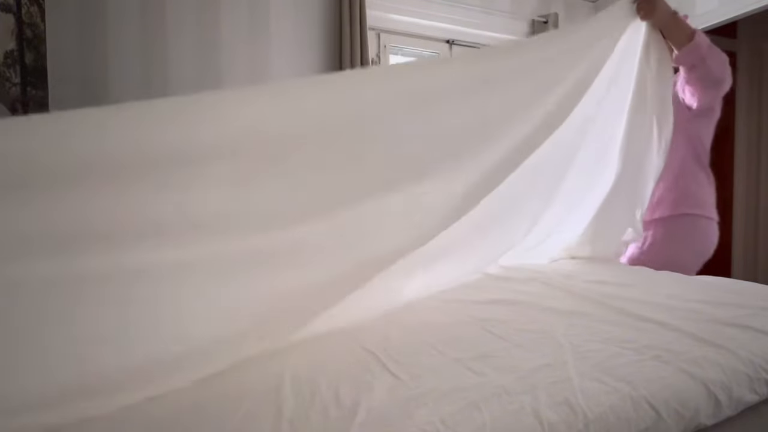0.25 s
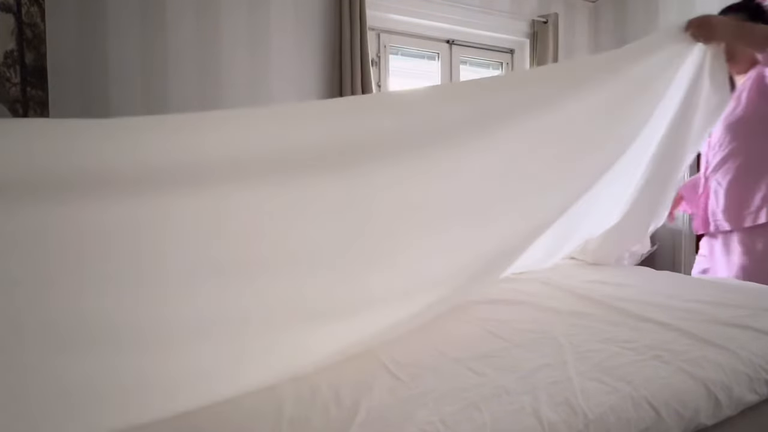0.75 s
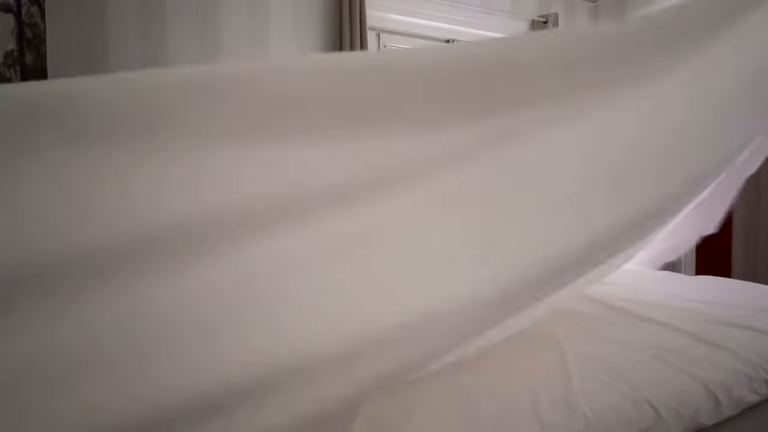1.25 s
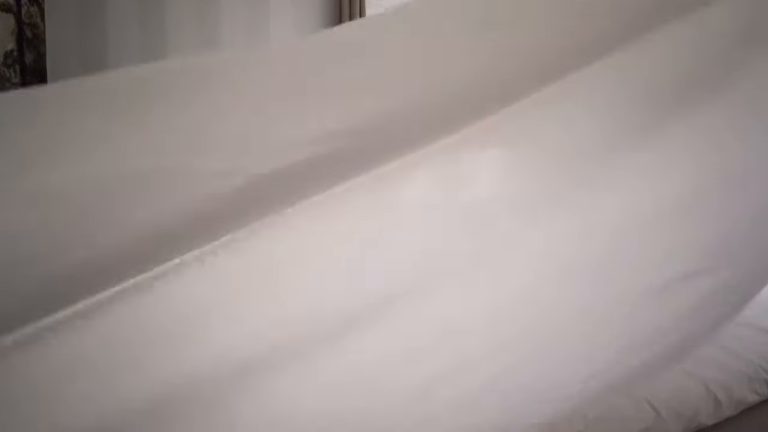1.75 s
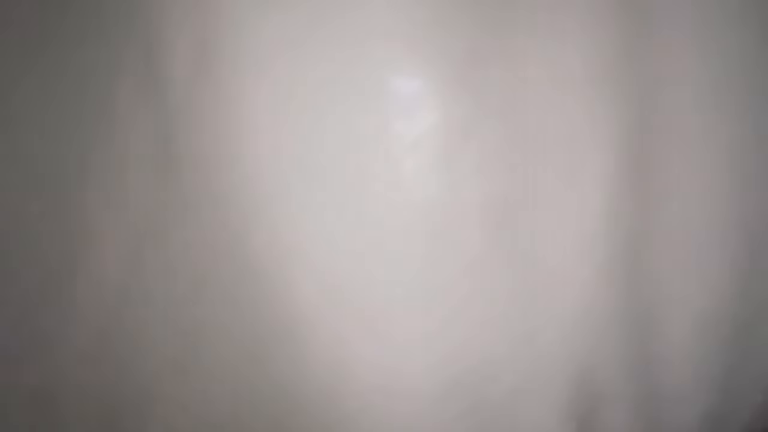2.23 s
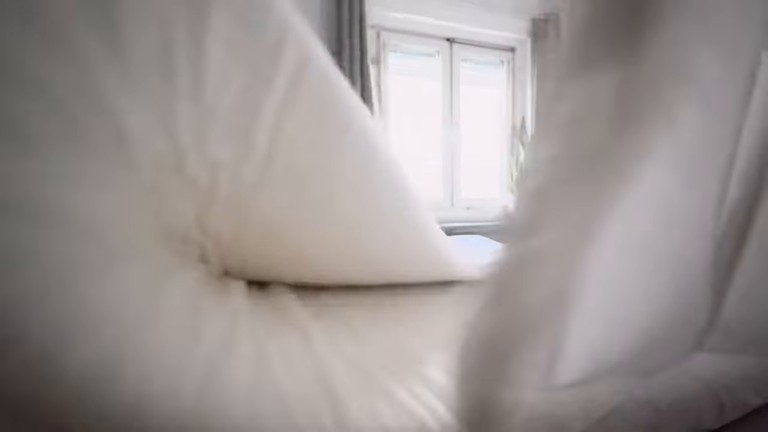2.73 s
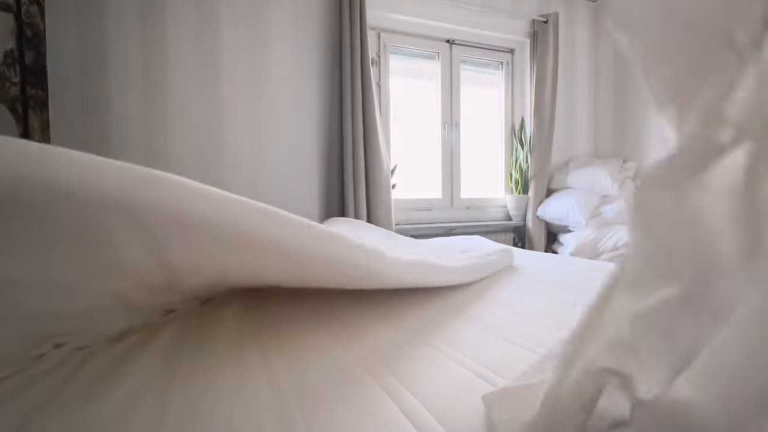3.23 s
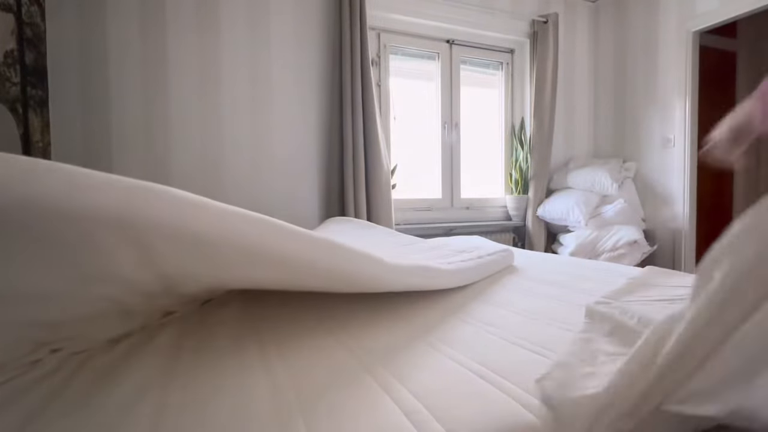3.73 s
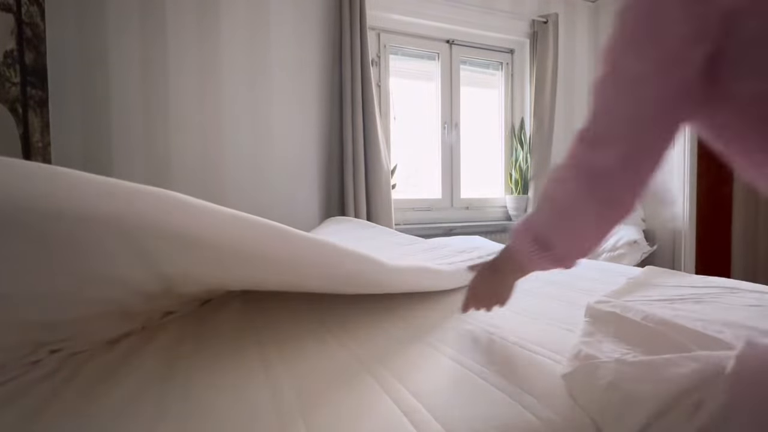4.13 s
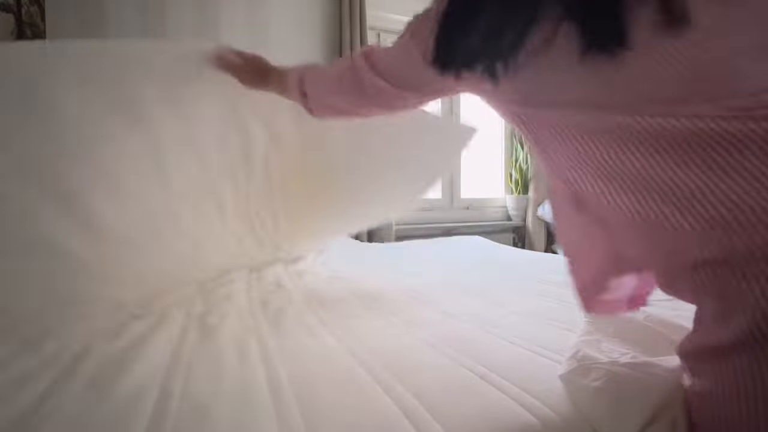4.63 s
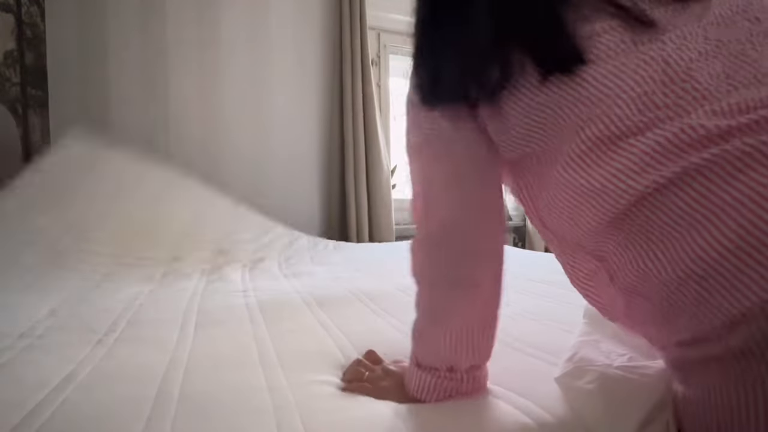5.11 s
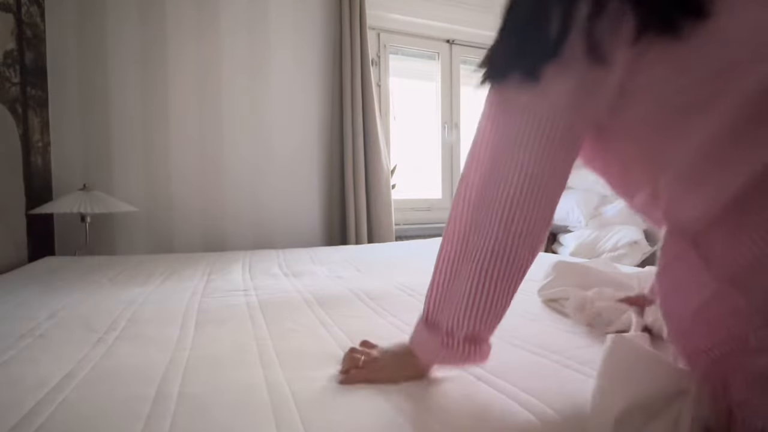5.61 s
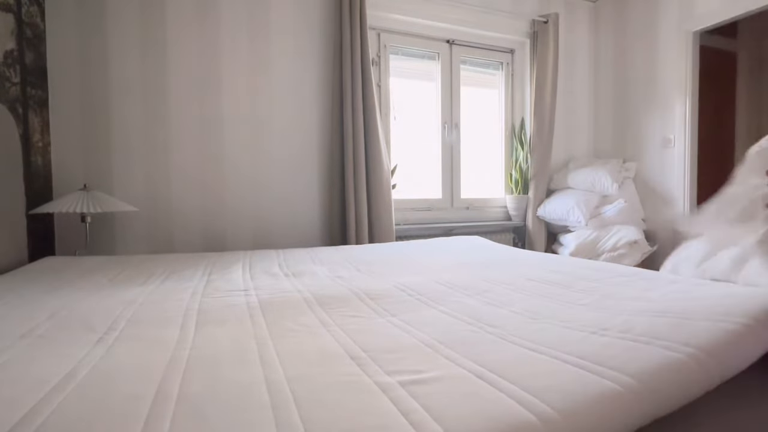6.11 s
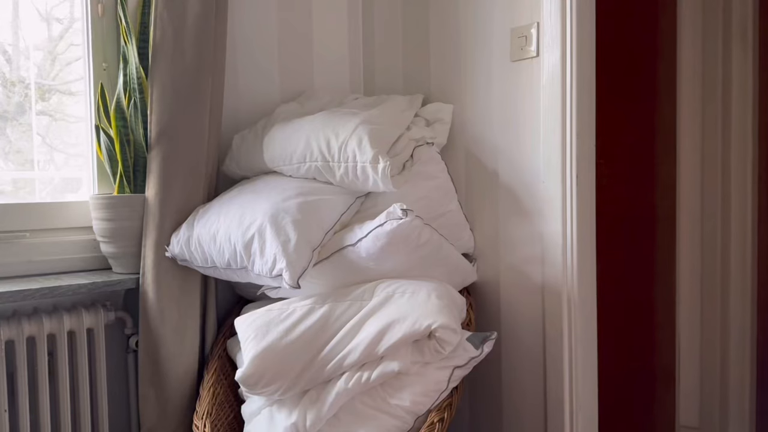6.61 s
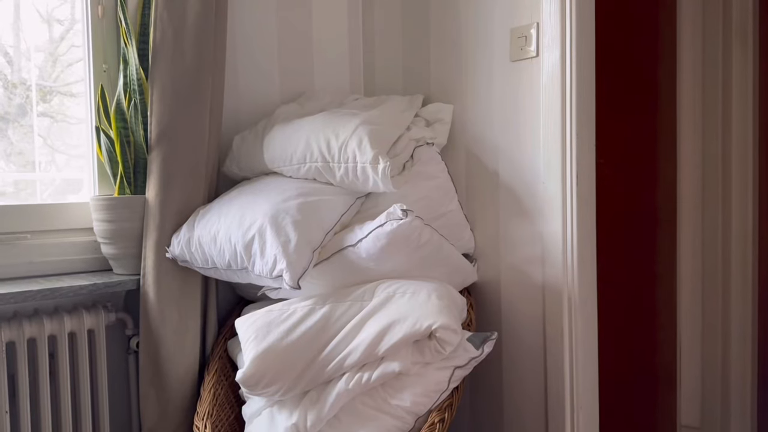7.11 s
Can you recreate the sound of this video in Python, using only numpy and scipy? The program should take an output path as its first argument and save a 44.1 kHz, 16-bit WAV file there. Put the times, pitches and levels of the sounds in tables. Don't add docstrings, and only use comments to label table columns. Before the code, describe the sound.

Close stereo sound in a small, short-reverberating bedroom with a faint low room hush. From 0 to 1 s, a cotton sheet slides softly, with light dull taps near 0.6. Rubbing swells to a raspy swish at 1.1, then a billowing flap at 1.2. At 1.39 a loud wooden clack with a metallic chirp and short hollow boom bursts out, quickly reseating. At 1.9 a soft low thump begins closer, fuller rustling on the left; crisp crease snaps and flaps crowd around 2.6-2.75. A sharp knock on the right comes at 3.26, a duller one at 4.0. Heavy topper folds puff low air around 4.7; the deepest, strongest thump lands at 5.24. Smoothing rubs and small knocks continue, with a crisper knock at 6.04. Everything cuts at 6.6 to near silence, with a faint bright click at 7.08, ending about 7.4.

```python
import sys
import numpy as np
from scipy import signal
from scipy.fft import rfft, irfft, next_fast_len
from scipy.io import wavfile
from scipy.ndimage import uniform_filter1d, map_coordinates

SR = 44100
rng = np.random.default_rng(int(sys.argv[2]) if len(sys.argv) > 2 else 0)


def invert_db(level):
    return 10 ** (np.asarray(level, dtype=float) / 20)


def unload_audio(sound):
    columns = np.transpose(np.atleast_2d(sound))
    steps = np.round(np.clip(columns, -1, 1) * 32767)
    wavfile.write(sys.argv[1], SR, steps.astype(np.int16))


N = 324311
PORT_LAG = 17 / SR

# (time [s], share from the right [0-1], left over right [dB])
PLACE = [(0, 0, 1.5), (.45, 0, 1), (.6, 1, 2.5), (1.1, 1, 0), (1.5, 0.2, 0.5), (1.88, 0.4, 4),
         (1.9, 0, 6.5), (2.95, 0.02, 0.5), (3.15, 0.98, -0.5), (3.75, 1, 0.5), (4.4, 0.95, 1),
         (5.5, .9, 0.5), (6.6, 1, 0), (6.62, 0.5, 2)]
# (start [s], rub [dB], billow [dB], fibre hiss [dB], pumped air [dB])
TAKES = [
    (0, -73, -80.5, -101, -87),
    (1.886, -79.5, -71.5, -90.5, -66),
    (6.611, -102, -99, -119, -86),
]


def unit(x):
    return x / np.sqrt(np.mean(x ** 2) + 1e-20)


def along(points, hz):
    f, v = np.transpose(points)
    return np.interp(np.log(hz + 1), np.log(f + 1), v)


def curves(rows):
    s, *cols = np.transpose(rows)
    return [np.interp(np.arange(N) / SR, s, c) for c in cols]


def wobble(rate):
    knots = rng.standard_normal(int(N * rate / SR) + 4)
    return map_coordinates(knots, [np.arange(N) * rate / SR])


def filtered(x, response):
    m = next_fast_len(N + SR // 2)
    return irfft(rfft(x, m) * response(np.fft.rfftfreq(m, 1 / SR)), m)[..., :N]


def banded(x, lo_hz, hi_hz, order):
    return signal.sosfilt(signal.butter(order, [lo_hz, hi_hz], "band", fs=SR, output="sos"), x)


def even(x, span_s):
    size = round(span_s * SR)
    power = np.mean(x ** 2, 0)
    smooth = np.abs(uniform_filter1d(uniform_filter1d(power, size), size))
    return unit(x / np.sqrt(smooth + .15 * np.mean(x ** 2)))


def ring(hz, t60, t, attack):
    return np.sin(2 * np.pi * hz * t) * invert_db(-60 * t / t60) * (1 - np.exp(-t / attack))


def click(lo_hz, hi_hz, size, order=2):
    blow = banded(invert_db(-60 * np.arange(size) / SR / 0.002), lo_hz, hi_hz, order=order)
    return blow / np.abs(blow).max()


def placed(sound, side):
    lag = round(abs(side) * 1.63 * PORT_LAG * SR)
    near = invert_db(0.68 * abs(side)) * sound[int(side > 0)]
    far = invert_db(-.3 * abs(side)) * sound[int(side <= 0)]
    far = np.pad(far, (lag, 0))[:len(near)]
    return np.array([far, near] if side > 0 else [near, far])


def centred(sound):
    return np.tile(sound, (2, 1))


def room(sound, wet_db):
    # (frequency [Hz], t60 [s])
    bedroom = [(100, .35), (400, .22), (1200, .29), (2500, .27), (5000, .26), (10000, .22)]
    hz, t, z = signal.stft(rng.standard_normal((2, SR // 4)), SR, nperseg=256)
    tail = signal.istft(z * invert_db(-60 * t / along(bedroom, hz)[:, None]), SR, nperseg=256)[1]
    tail = tail * (1 + .7 * np.exp(-np.arange(tail.shape[1]) / SR / .005))
    tail = np.pad(tail / np.linalg.norm(tail[0]), ((0, 0), (SR // 1500, 0)))
    wet = invert_db(wet_db) * signal.fftconvolve(sound, tail, axes=1)
    return wet + np.pad(sound, ((0, 0), (0, wet.shape[1] - sound.shape[1])))


def add(track, s, sound):
    part = track[:, round(s * SR):][:, :sound.shape[-1]]
    part += sound[..., :part.shape[1]]


def cloth():
    # (frequency [Hz], level per Hz [dB])
    rub_spectrum = [(290, -35), (500, -23), (609, -2), (667, -6), (867, 0.5), (2060, -6), (2540, -8),
                    (6050, -10.5), (9820, -17), (11500, -28), (15000, -76), (22000, -120)]
    billow_spectrum = [(59, -34), (100, 5.5), (365, -1), (433, 0.5), (810, -4), (934, -12), (1370, -6.5),
                       (3000, -38.5), (3900, -52.5), (6600, -120)]
    fibre_spectrum = [(6470, -61.5), (11000, -23.5), (11300, -39), (11500, -2), (12800, -2.5),
                      (16000, -3.5)]
    pump_spectrum = [(15, -48), (25, -16.5), (40, -3), (59, 7), (97, -13), (140, -10), (173, -23),
                     (200, -11), (260, -24), (440, -120)]
    rub_db, billow_db, fibre_db, pump_db = motion()
    flutter = wobble(12)
    rub = invert_db(rub_db + 5.5 + 0.75 * flutter) * rustle(rub_spectrum, grain_db=0.4, patchy_db=2.0)
    billow_db = billow_db + 1.5 + .6 * flutter + 1.5 * wobble(30)
    billow_noise = rustle(billow_spectrum, grain_db=1.0, patchy_db=2.5)
    billow = invert_db(billow_db) * even(billow_noise, span_s=.025)
    hiss = rustle(fibre_spectrum, grain_db=1.0, patchy_db=-2.0, lag=0)
    fibre = invert_db(fibre_db + 8.5 + 0.6 * flutter) * hiss
    pump = invert_db(pump_db + 1.2 * wobble(18.0)) * even(rustle(pump_spectrum), span_s=0.057)
    return rub + billow + fibre + pump


def motion():
    # (top speed [s], rise [s], fall [s], rub
    # [dB], fibre hiss over rub [dB])
    cloth_strokes = [(.06, 0.026, 0.14, -71.5, -21), (.242, 0.054, 0.062, -71, -19),
                     (.57, .15, 0.25, -77, -29), (.768, 0.35, 0.29, -66.5, -18.5),
                     (1.04, 0.083, 0.23, -59, -17.5), (1.11, 0.076, 0.067, -53, -22.5),
                     (1.25, 0.038, 0.2, -63.5, -24), (1.35, 0.11, 0.26, -60.5, -20.5),
                     (1.708, 0.11, 0.19, -70, -21), (1.889, .01, 0.18, -61, -18.5),
                     (1.993, 0.099, 0.214, -58, -13), (2.179, 0.071, 0.0096, -64, -12),
                     (2.4, 0.73, 0.38, -63, -19.5), (2.617, 0.15, 0.11, -59, -21.5),
                     (2.685, .035, 0.05, -52.5, -12), (2.75, 0.06, 0.34, -59.5, -14),
                     (3.25, 0.037, 0.37, -65.5, -21), (3.56, 0.061, 0.077, -67, -14),
                      (3.79, 0.38, 0.17, -61, -18), (4.061, 0.081, 0.5, -66.5, -35),
                      (4.36, 0.25, 0.2, -65.5, -15), (4.651, 0.095, 0.18, -61.5, -11),
                      (5.034, 0.13, 0.27, -60.5, -17), (5.33, 0.064, 0.09, -61.5, -24.5),
                      (5.53, 0.075, 0.13, -63, -29), (5.8, 0.09, 0.14, -57, -24),
                      (6.27, 0.15, 0.13, -61, -18.5), (6.43, 0.48, 0.11, -61.5, -23),
                      (6.57, 0.093, .1, -60.5, -22)]
    # (time [s], length [s], billow
    # [dB], pumped air [dB])
    cloth_folds = [(0.043, 0.42, -67, -69), (0.238, 0.12, -71, -52.5), (0.46, 0.02, -64.5, -76),
                   (0.767, 0.26, -66.5, -82), (0.903, 0.21, -63, -62), (1.106, 0.14, -58.5, -53.5),
                   (1.205, 0.076, -46, -46), (1.422, 0.17, -47.5, -45.5), (1.636, 0.26, -61, -54),
                   (1.902, 0.14, -48.5, -44.5), (2.251, 0.33, -60, -76), (2.413, 0.1, -59.5, -40),
                   (2.616, 0.051, -47.5, -42.5), (2.707, 0.055, -43, -44), (2.85, 0.25, -57, -55),
                   (2.997, 0.063, -53, -83.5),
                   (3.187, 0.094, -52, -43.5), (3.36, 0.12, -58, -53), (3.481, 0.054, -52.5, -54),
                    (3.57, 0.2, -55, -66), (3.738, 0.17, -63, -67), (3.85, 0.21, -59, -65),
                    (4.079, 0.29, -63.5, -55), (4.33, 0.93, -69, -69.5), (4.642, 0.071, -54, -54),
                    (4.719, 0.077, -61, -34.5), (4.847, 0.047, -62, -39), (5.02, 0.22, -54, -60),
                    (5.109, 0.13, -66, -59), (5.358, 0.068, -52.5, -35.5), (5.48, 0.078, -51.5, -66),
                    (5.563, 0.089, -48.5, -53), (5.79, 0.21, -54.5, -68), (5.94, 0.11, -57, -72),
                    (6.035, 0.19, -56, -49.5), (6.261, 0.28, -52.5, -50), (6.45, 0.17, -49.5, -52),
                    (6.569, 0.076, -48, -62), (6.818, 0.039, -83, -84), (7.18, 0.087, -88.5, -84.5)]
    strokes = cloth_strokes
    folds = cloth_folds
    fold_rise = 0.63
    _, rub_rest, billow_rest, fibre_rest, air_rest = np.transpose(TAKES)
    rubs = [(s, rise, fall, db) for s, rise, fall, db, _ in strokes]
    billows = [(s, fold_rise * length, length, db) for s, length, db, _ in folds]
    hisses = [(s, rise, fall, db + over_db) for s, rise, fall, db, over_db in strokes]
    pumps = [(s, fold_rise * length, length, db) for s, length, _, db in folds]
    return (moves(rubs, rub_rest, 0.91), moves(billows, billow_rest, 1),
            moves(hisses, fibre_rest, 1.9), moves(pumps, air_rest, 1.4))


def moves(events, rest_db, steeper):
    slope_db = 10.5
    t = np.arange(0, N, 32) / SR
    cuts = np.transpose(TAKES)[0][1:]
    take = np.searchsorted(cuts, t)
    power = invert_db(2 * rest_db[take])
    for s, rise, fall, db in events:
        away = np.where(t < s, (s - t) / rise, (t - s) / fall)
        same_take = take == np.searchsorted(cuts, s)
        power = power + same_take * invert_db(2 * (db - steeper * slope_db * away))
    return np.interp(np.arange(N) / SR, t, 10 * np.log10(power))


def rustle(spectrum, grain_db=0, patchy_db=0, lag=PORT_LAG):
    # (frequency [Hz], share of direct sound [0-1])
    direct_share = [(60, 0.93), (250, 0.54), (1000, 0.5), (4000, 0.1), (9000, 0), (12000, 0.3), (15000, 1)]
    slips = rng.standard_normal((3, N))
    if patchy_db:
        z = signal.stft(slips * invert_db(grain_db * wobble(250)), nperseg=512)[2]
        patches = uniform_filter1d(rng.standard_normal(z.shape[1:]), 5, 0)
        patches = uniform_filter1d(patches, 6, 1)
        slips = signal.istft(z * invert_db(patchy_db * unit(patches)), nperseg=512)[1][:, :N]
    near, *far = slips
    share = lambda hz: np.clip(along(direct_share, hz), 0, 1)
    near = filtered(near, lambda hz: invert_db(along(spectrum, hz)) * np.sqrt(share(hz)))
    far = filtered(np.array(far), lambda hz: invert_db(along(spectrum, hz)) * np.sqrt(1 - share(hz)))
    late = np.roll(near, round(lag * SR))
    right, pan_db = curves(PLACE)
    right = np.clip(right, 0, 1)
    direct = np.array([right * late + (1 - right) * near, right * near + (1 - right) * late])
    return unit(direct / np.hypot(right, 1 - right) + far) * invert_db([pan_db / 2, -pan_db / 2])


def scrapes():
    # (time [s], length [s], level [dB], centre [Hz], width [Hz])
    band_swells = [(.49, .03, -64, 1300, 300), (.494, .055, -60.5, 725, 1040),
                   (.54, 0.095, -61, 2220, 2420), (.55, 0.027, -63, 1500, 300),
                   (0.643, .04, -62, 2530, 1500), (1.03, 0.11, -57, 600, 250),
                   (1.07, .04, -56, 2330, 300), (1.099, 0.054, -45, 2620, 1246),
                   (1.125, 0.025, -54, 3240, 250), (1.205, 0.035, -49.5, 1000, 800),
                   (1.27, 0.043, -56, 2800, 1200), (1.325, 0.04, -66, 9300, 800),
                   (1.482, .026, -55, 440, 90), (1.502, 0.18, -54, 190, 100),
                   (1.54, 0.065, -50.5, 444, 79.5), (1.617, 0.042, -56.5, 440, 79.6),
                   (1.984, 0.008, -53, 4540, 4394), (2.0, 0.055, -62, 5500, 2000),
                   (2.045, 0.014, -53, 1870, 1200), (2.174, 0.0036, -51.5, 4170, 4800),
                   (2.177, 0.0089, -53.5, 1300, 700), (2.385, .027, -54, 1150, 600),
                   (2.575, .025, -61, 5600, 1200), (2.58, .023, -51.5, 1520, 1190),
                   (2.617, 0.017, -49.5, 3500, 4148), (2.668, 0.055, -58, 5650, 1300),
                   (2.701, 0.033, -49, 905, 1180), (2.708, .03, -61, 5600, 1800),
                   (2.722, .0065, -55, 1296, 1500),
                   (3.0, 0.02, -58, 600, 700), (3.163, 0.03, -62, 350, 700),
                     (3.252, 0.0044, -55, 700, 900), (3.279, .012, -49, 1500, 300),
                     (3.471, 0.0093, -55, 740, 600), (3.488, 0.012, -56, 800, 690),
                     (3.786, .01, -57, 1400, 500), (3.841, 0.011, -54.5, 3040, 670),
                     (3.884, 0.0094, -54, 450, 500), (3.99, 0.0034, -55, 3600, 600),
                     (4.649, 0.013, -52.5, 1500, 350), (5.24, .01, -56.5, 1770, 200),
                     (5.246, 0.012, -49, 1852, 2670), (5.259, 0.0091, -59, 1300, 250),
                     (5.261, 0.012, -42, 800, 250), (5.287, 0.04, -40, 197, 80),
                     (5.546, 0.059, -55.5, 875, 900), (5.797, .1, -56.5, 1950, 1500),
                     (6.255, 0.02, -56, 860, 250)]
    out, t = np.zeros((2, N)), np.linspace(-.125, .125, SR // 4)
    for s, length, db, hz, width_hz in band_swells:
        grain = np.repeat(rng.standard_normal(len(t) // 90 + 1), 90)[:len(t)]
        grit = rng.standard_normal(len(t)) * invert_db(4.0 * grain)
        edge = np.sqrt(hz * hz + width_hz ** 2 / 4) - width_hz / 2
        band = even(banded(grit, edge, edge + width_hz, order=2)[None], span_s=.008)[0]
        swell = band * np.exp(-(t / length) ** 2 * 2)
        add(out, s + t[0], room(placed(centred(invert_db(db - 2.0) * swell), 0.23), wet_db=-1))
    return out


def creases():
    # (time [s], peak [dB], brightest frequency [Hz])
    snaps = [(1.9787, -41, 4970), (2.045, -50, 3000), (2.1712, -49, 5000), (2.3922, -56, 2500),
             (2.5035, -50, 1500), (2.5204, -43, 4500), (2.5778, -47, 2500), (2.6082, -40, 4500),
             (2.6785, -42, 3500), (2.6855, -47, 2500), (2.6965, -48, 2000), (2.7105, -49, 1800),
             (2.722, -50, 2200), (2.7539, -42, 2400), (2.777, -54, 2500), (2.811, -50, 4470),
             (2.830, -52, 2220), (2.9325, -49, 4000), (3.169, -54, 3000), (3.8356, -46, 3500),
             (4.6435, -55, 1500), (5.4999, -48, 3500), (5.683, -58, 3500), (5.7119, -55, 3500),
             (6.0411, -53, 3000)]
    out = np.zeros((2, N))
    right = curves(PLACE)[0]
    for s, db, hz in snaps:
        snap = centred(invert_db(db + 6) * click(hz / 3, 1.6 * hz, size=600))
        add(out, s, room(placed(snap, right[round(s * SR)] - .65), wet_db=-1.5))
    return out


def slam():
    # (time [s], boom [dB], tick [dB], time until the next contact mutes it [s])
    contacts = [
        (1.3878, -8, -20.5, .019),
        (1.4094, -13.5, -32, .025),
        (1.442, -30, -43, 0.022),
    ]
    # (frequency [Hz], left [dB], right [dB], t60 [s])
    panel_modes = [(230, -30, -28, 0.087), (289.3, -6.5, -8.5, 0.11), (350, -11.5, -16, 0.061),
                   (407.5, 1, 0, 0.21), (440, -8.5, -14.5, 0.39), (510, -2, -3.5, 0.06),
                   (570, -9, -7.5, 0.088), (619, -16.5, -13.5, 0.09), (815.5, -16.5, -18, 0.31)]
    # (time [s], frequency [Hz], level [dB], t60 [s])
    chirps = [(1.380, 600, -33, .03), (1.384, 3700, -40, .02), (1.3872, 4280, -14.5, .008),
              (1.3895, 2400, -22, 0.027), (1.3945, 3500, -25, .016), (1.3878, 5600, -29.5, .01),
              (1.392, 2950, -28.5, 0.033)]
    out, t = np.zeros((2, N)), np.arange(SR // 4) / SR
    panel = sum(invert_db([[left_db], [right_db]]) * ring(hz, t60, t, 1.1 / hz)
                for hz, left_db, right_db, t60 in panel_modes)
    for s, boom_db, tick_db, free in contacts:
        boom = invert_db(boom_db - 60 * np.maximum(t - free, 0) / 0.017) * panel
        tick = centred(invert_db(tick_db) * click(1200, 5600, size=len(t)))
        add(out, s + 0.003, room(placed(boom, 0.81), wet_db=-8.5))
        add(out, s, room(placed(tick, 0.64), wet_db=14.0))
    for s, hz, db, t60 in chirps:
        chirp = centred(invert_db(db) * ring(hz, t60, t, 0.00053))
        add(out, s, room(placed(chirp, 0.71), wet_db=-7.0))
    return out


def knocks():
    # (time [s], peak [dB], pitch [Hz], crack [dB], side [-1 left to 1 right])
    dull = [(.611, -49.5, 430, -27, 0.97), (.6195, -41, 440, -28, -0.53), (0.635, -49, 427, -36, 0.56),
            (.655, -45.5, 400, -28, 0.2), (1.187, -35.5, 824, -8, 0.62), (2.684, -48, 700, -6, -0.45),
            (2.709, -49, 262, -8, -0.68), (2.72, -43.5, 206, -6, -0.65), (2.754, -48.5, 230, -2, -.6),
            (2.993, -53, 420, -5.5, 0.12), (3.282, -45, 503, -24, .8), (3.296, -41, 433, -27, 0.68),
            (3.308, -42, 323, -26, .8), (3.9897, -32, 555, -11, 0.28), (3.9915, -33.5, 405, -29, 0.72),
            (3.9955, -36, 274, -31, -0.083), (4.003, -37, 580, -32, 0.21), (4.013, -39, 380, -29, .5),
            (4.021, -45, 442, -28, 0.85), (5.24, -34.5, 285, -9.5, 0.64), (5.263, -31.5, 191, -29, 0.53),
            (5.446, -52, 416, -12, 0.69), (5.556, -43, 440, -11, 0.62), (5.89, -46.5, 444, -14, 0.68),
            (5.942, -43, 480, -10.5, 0.86), (5.956, -51.5, 199, -18, 0.79), (6.06, -42.5, 308, -26, 0.74),
            (6.09, -43, 323, -21, 0.41), (6.208, -46, 427, -15, 0.86), (6.224, -48, 247, -8, 0.79),
            (6.554, -53, 313, -4, 1)]
    crisp = [(2.603, -54.5, 190, 9, -1.55), (3.2558, -22, 470, -13, .8), (3.2535, -30.5, 620, -17, .8),
             (3.466, -52, 590, -12, 0.24), (6.042, -28.5, 446, -20.5, 1)]
    bright = [(1.889, -46, 197, -7, -0.2), (3.264, -35, 467, -3.5, 0.89), (7.084, -60, 350, 8, 0.25)]
    out, t = np.zeros((2, N)), np.arange(SR // 8) / SR
    for rows, top_hz in ((dull, 1300), (crisp, 3500), (bright, 8200)):
        for s, db, hz, crack_db, side in rows:
            t60 = 12.5 / hz
            board = ring(hz, t60, t, 0.0018)
            board += 0.28 * ring(.63 * hz, 2.0 * t60, t, 0.0061)
            board += 0.3 * ring(1.3 * hz, 0.77 * t60, t, 0.000088)
            crack = invert_db(db + crack_db + 8.5) * click(590, top_hz, size=len(t), order=3)
            add(out, s, room(placed(centred(invert_db(db + 8.0) * board), side), wet_db=-4.5))
            add(out, s, room(placed(centred(crack), side), wet_db=4.0))
    return out


def thumps():
    # (time [s], push [dB], push frequency [Hz], room ring [dB])
    landings = [(0.091, -51, 82.5, -48.5), (0.618, -48, 91, -53), (1.198, -43, 127, -49),
                (1.43, -29.5, 110, -36.5), (1.445, -28.5, 270, -71), (1.503, -34.5, 136, -57),
                (1.886, -33, 111, -69), (1.909, -28.5, 88, -42.5), (2.383, -47, 70, -48),
                (2.43, -37, 71.4, -56), (2.603, -33, 147, -61), (2.708, -38, 109, -61),
                (2.732, -40, 75, -67), (3.151, -45, 100, -52), (3.27, -39, 110, -50.5),
                (3.308, -40, 80, -57), (4.001, -54, 90, -37), (4.699, -31.5, 114, -40),
                (4.748, -28, 70, -38), (4.846, -36.5, 120, -89), (5.02, -33.5, 104, -47),
                (5.041, -44.5, 167, -60), (4.83, -49, 240, -71), (3.489, -47, 149, -57),
                (5.234, -19.5, 105, -72), (5.244, -9.5, 100, -17), (6.274, -46, 67.5, -54.5),
                (6.584, -35, 71, -65), (7.096, -62.5, 80.3, -66.5)]
    # (frequency [Hz], level [dB], t60 [s])
    room_modes = [(54.72, 4, 0.78), (72.95, -6, 0.76), (120, -15, 0.41), (219, -19.5, 0.63)]
    out, t = np.zeros((2, N)), np.arange(SR) / SR
    modes = sum(invert_db(db) * ring(f, t60, t, 0.015) for f, db, t60 in room_modes)
    for s, push_db, hz, ring_db in landings:
        push = np.cos(2 * np.pi * hz * (t - .011) + 0.99)
        push *= np.exp(-((t - .011) / .0075) ** 2) * (1 - np.exp(-(t / .004) ** 2))
        add(out, s, placed(centred(-invert_db(push_db - 3.5) * push), 0.48))
        add(out, s - .0035, placed(centred(invert_db(ring_db - 1.0) * modes), .6))
    return out


def latch():
    # (frequency [Hz], level [dB], t60 [s])
    catch_modes = [(1500, -4, .025), (2800, -1.5, 0.03), (3020, -4.5, 0.028), (4280, -4, 0.028),
                   (5240, -7, 0.023), (6300, -2.5, 0.032), (6970, -2, 0.018), (8300, -5, 0.017),
                   (9200, -8, 0.019)]
    out, t = np.zeros((2, N)), np.arange(SR // 8) / SR
    catch = sum(invert_db(db) * ring(hz, t60, t, .003) for hz, db, t60 in catch_modes)
    add(out, 7.0805, room(placed(centred(invert_db(-50) * catch), 0.37), wet_db=0.0))
    return out


def hush():
    # (frequency [Hz], level per Hz [dB])
    hush_spectrum = [(15, -41), (25, -14.5), (54, 1.5), (76, -7.5), (286, -12), (326, -19.5), (392, -13),
                     (448, -17), (846, -24), (4850, -30), (6850, -22.5), (7820, -31), (14000, -43)]
    return invert_db(-79) * rustle(hush_spectrum)


def scene():
    # (frequency [Hz], left over right [dB])
    port_shading = [(150, -2.5), (290, 0), (400, -6), (600, 0), (1500, 2), (5000, 6), (10000, 2)]
    shade = lambda hz: invert_db(np.outer([.5, -.5], along(port_shading, hz)))
    sharp = knocks() + slam() + latch() + scrapes() + creases()
    hits = thumps() + filtered(sharp, shade)
    t = np.arange(N) / SR
    hits *= 1 - (t > 6.612) * (t < 7.07)
    return hits + cloth() + hush()


def band_limit(x):
    return signal.sosfilt(signal.butter(12, 15800, fs=SR, output="sos"), x)


def record(dry):
    # (frequency [Hz], gain [dB])
    weak_band = [(10300, -1.5), (10700, -10), (12200, -14.5), (12700, 0.5)]
    cut = signal.sosfilt(signal.butter(4, 44, "high", fs=SR, output="sos"), dry)
    mix = filtered(cut, lambda hz: invert_db(along(weak_band, hz)))
    return band_limit(mix)


dry = scene()
out = record(dry)
unload_audio(out)
```